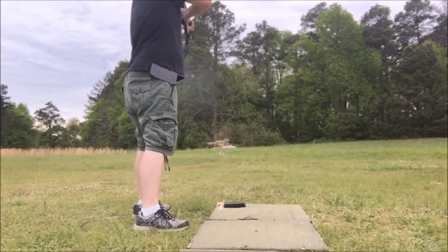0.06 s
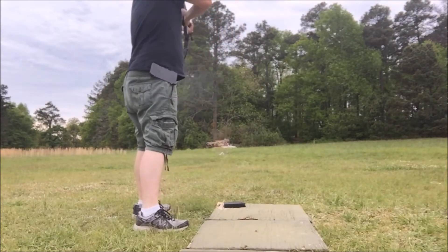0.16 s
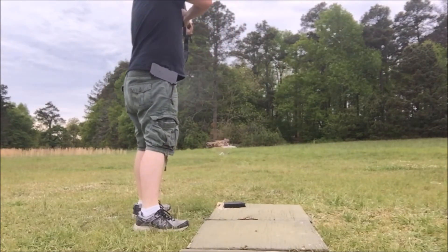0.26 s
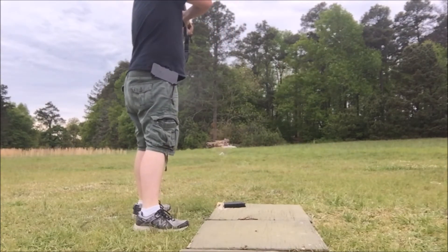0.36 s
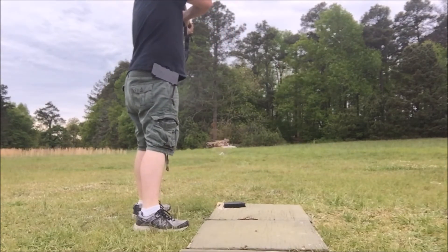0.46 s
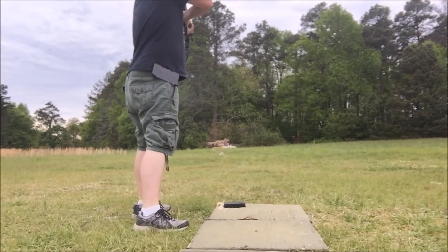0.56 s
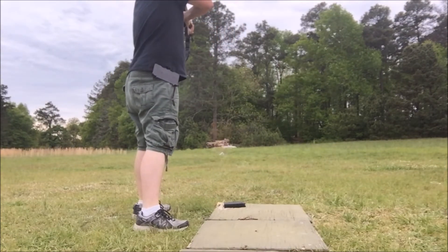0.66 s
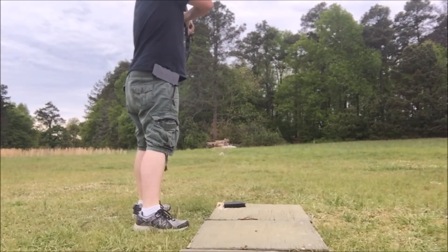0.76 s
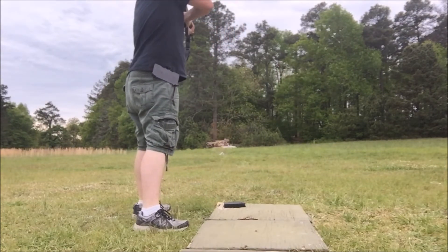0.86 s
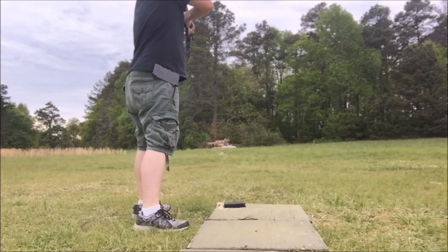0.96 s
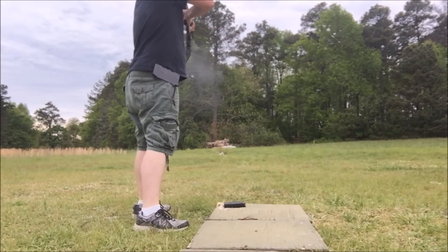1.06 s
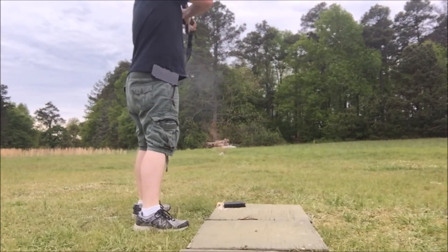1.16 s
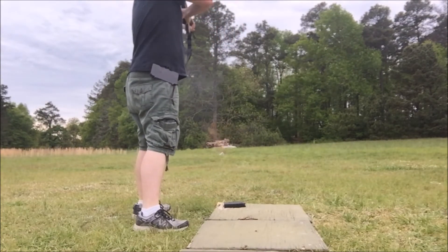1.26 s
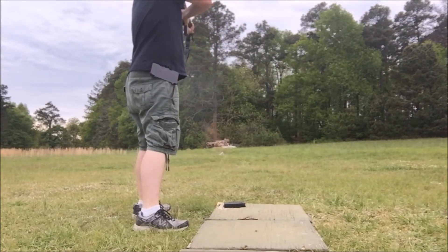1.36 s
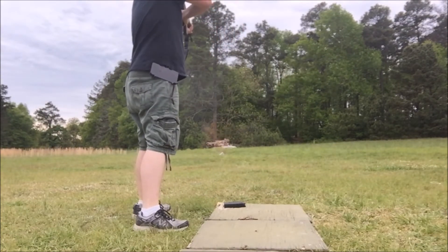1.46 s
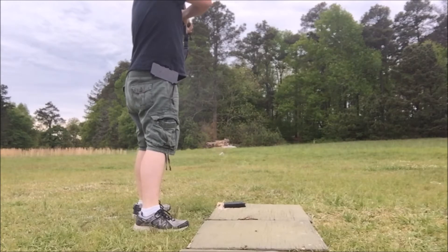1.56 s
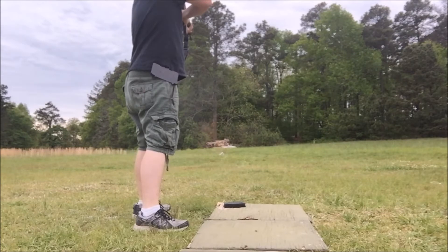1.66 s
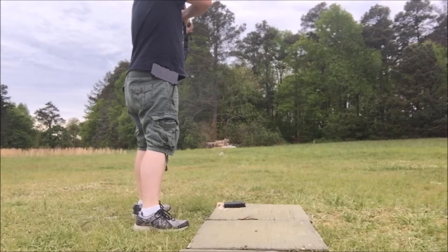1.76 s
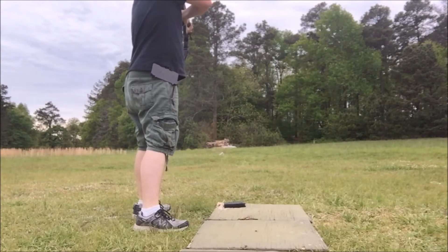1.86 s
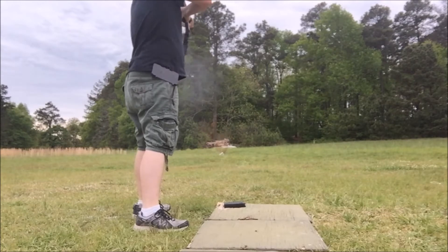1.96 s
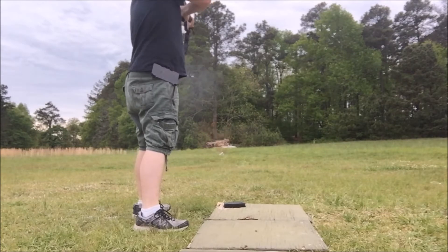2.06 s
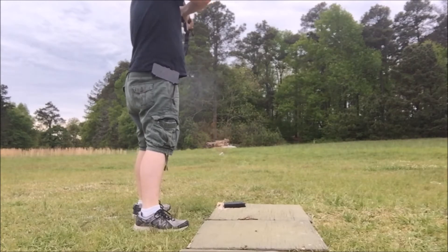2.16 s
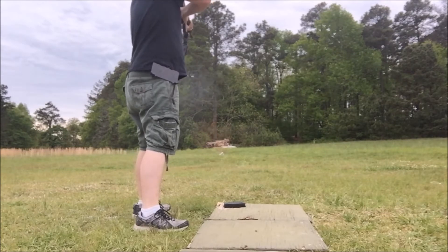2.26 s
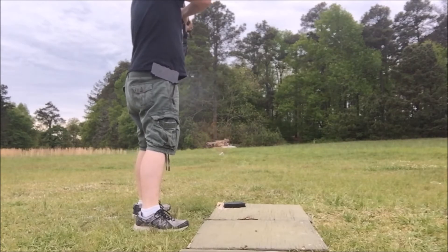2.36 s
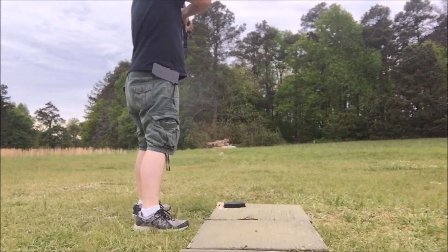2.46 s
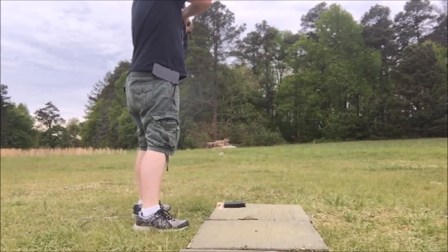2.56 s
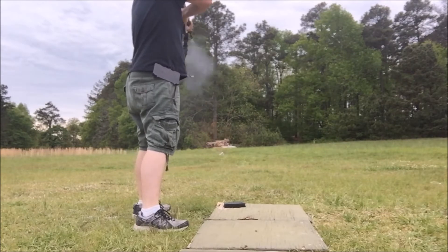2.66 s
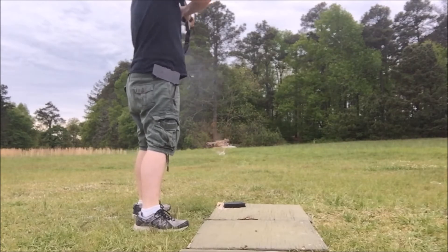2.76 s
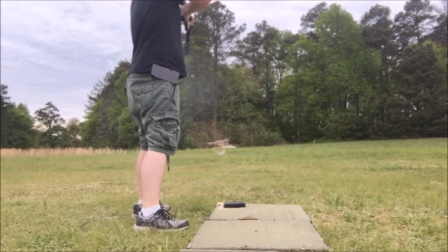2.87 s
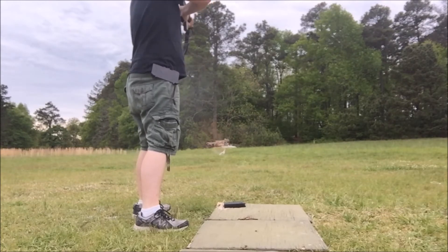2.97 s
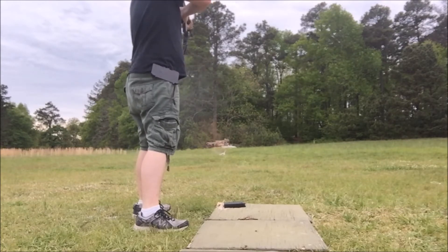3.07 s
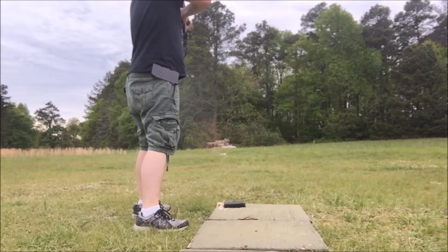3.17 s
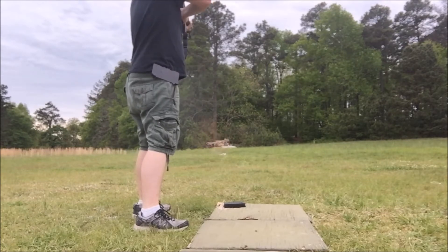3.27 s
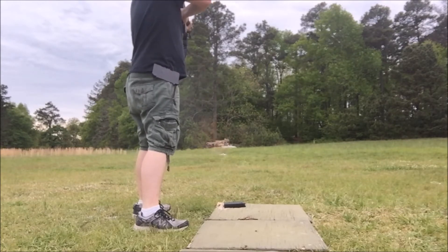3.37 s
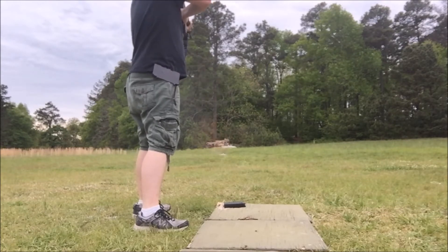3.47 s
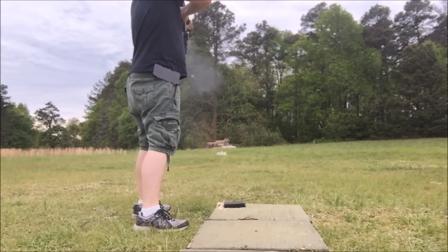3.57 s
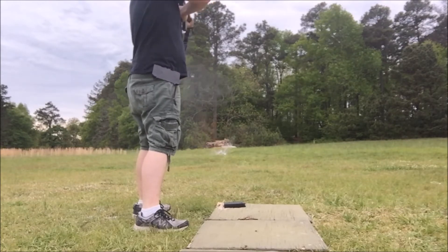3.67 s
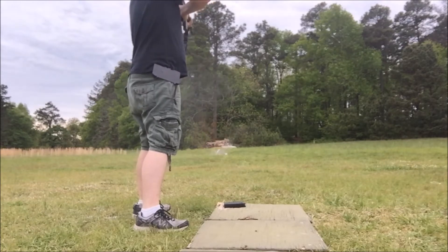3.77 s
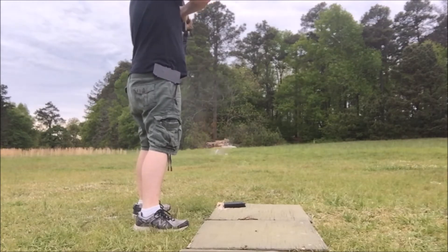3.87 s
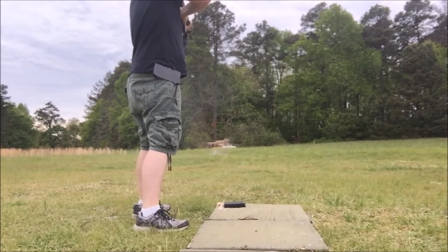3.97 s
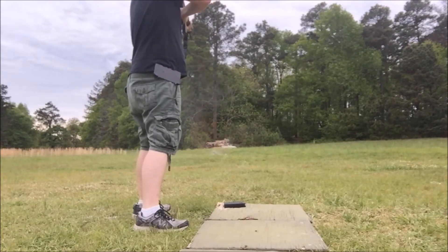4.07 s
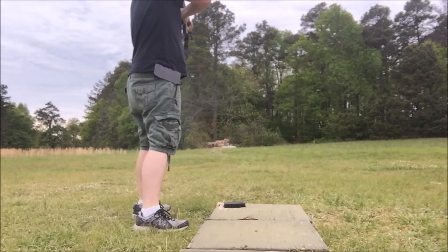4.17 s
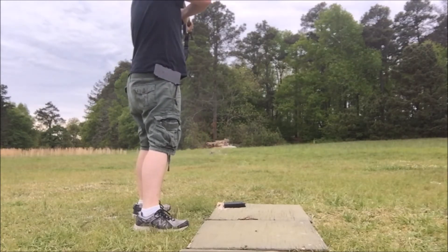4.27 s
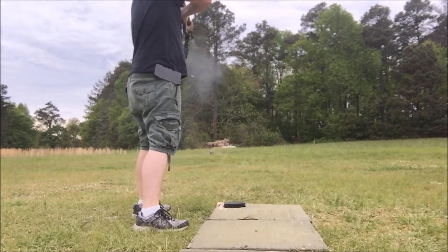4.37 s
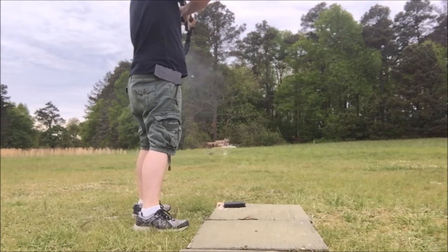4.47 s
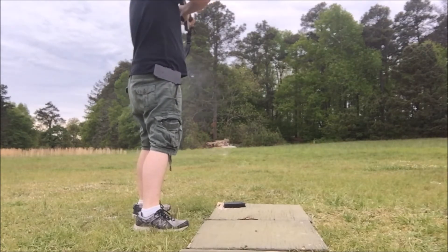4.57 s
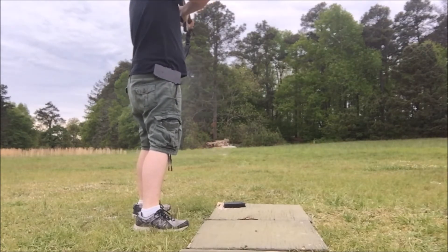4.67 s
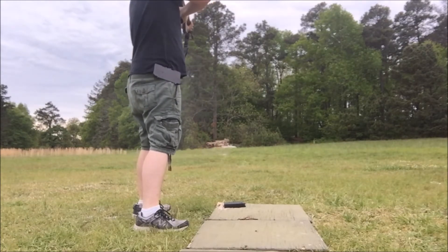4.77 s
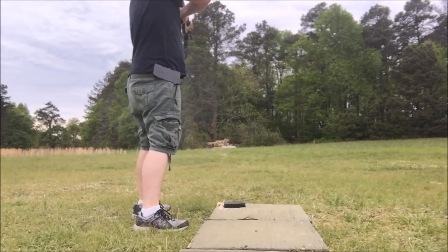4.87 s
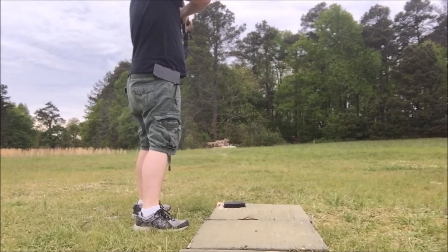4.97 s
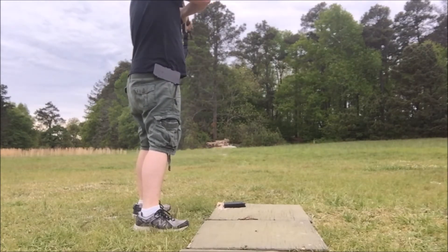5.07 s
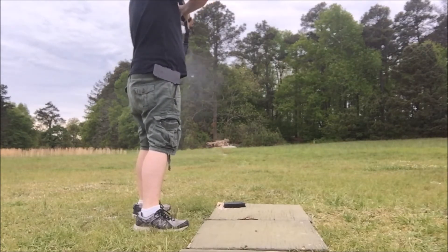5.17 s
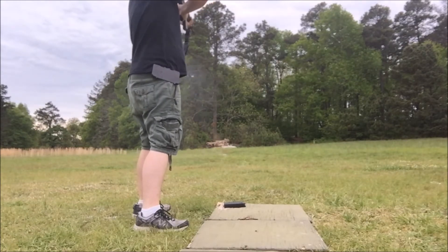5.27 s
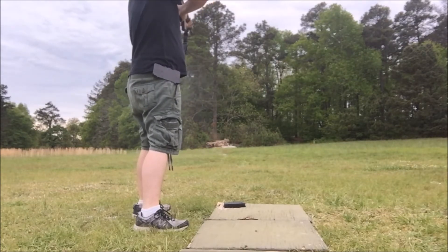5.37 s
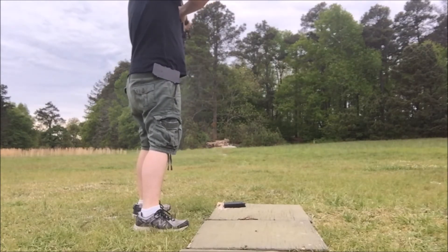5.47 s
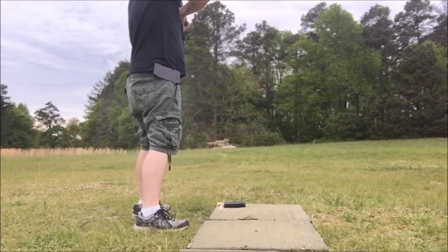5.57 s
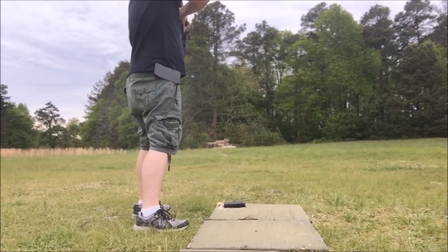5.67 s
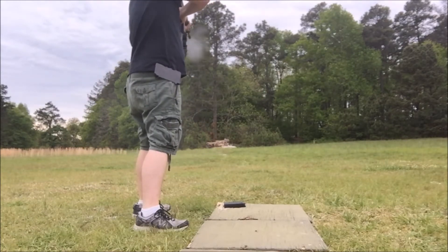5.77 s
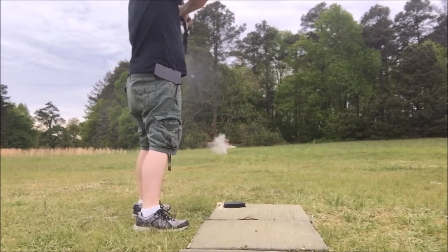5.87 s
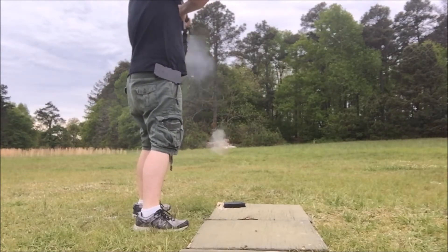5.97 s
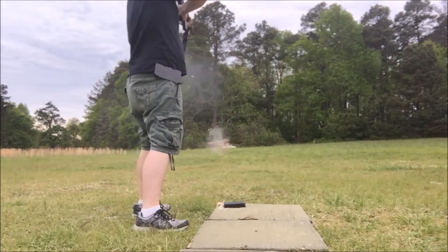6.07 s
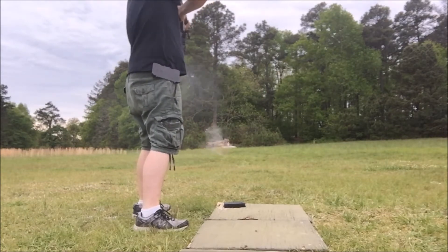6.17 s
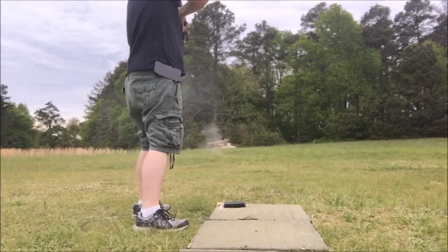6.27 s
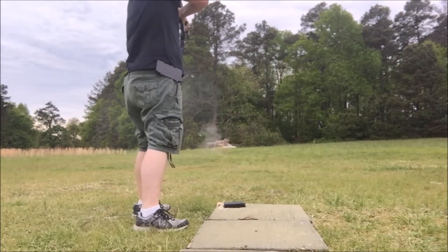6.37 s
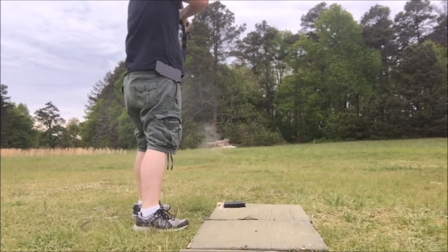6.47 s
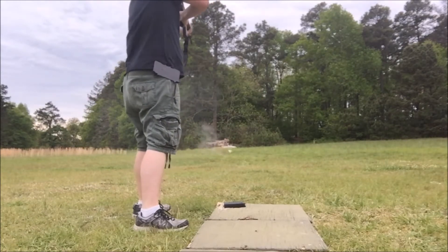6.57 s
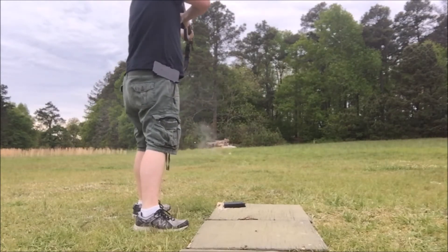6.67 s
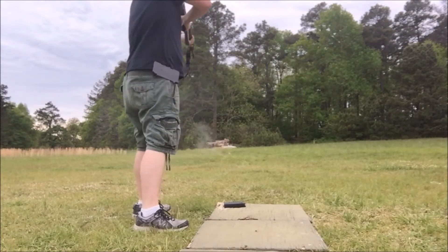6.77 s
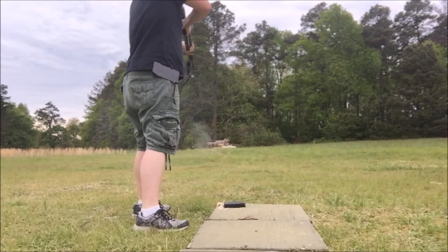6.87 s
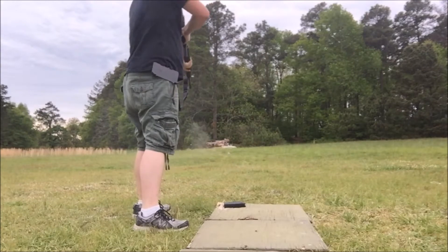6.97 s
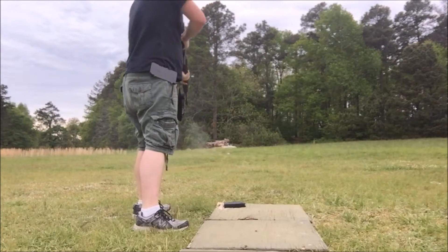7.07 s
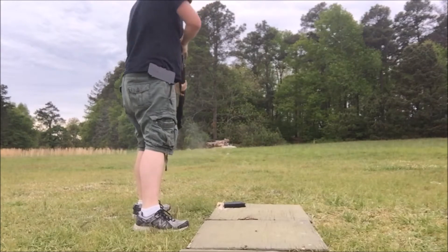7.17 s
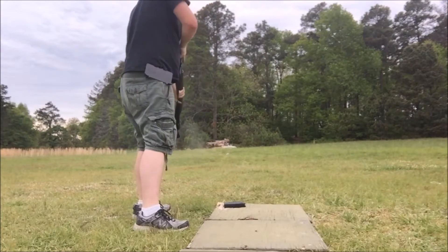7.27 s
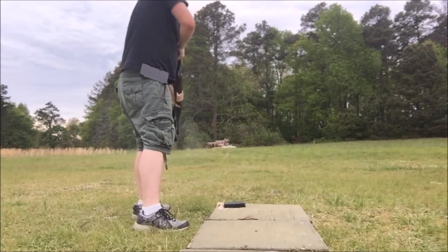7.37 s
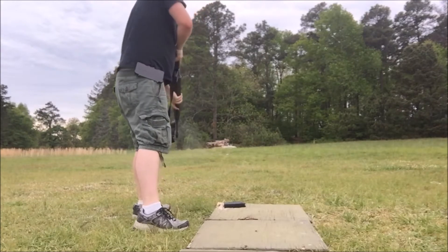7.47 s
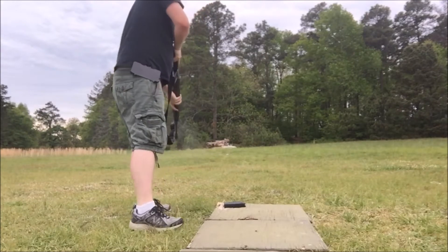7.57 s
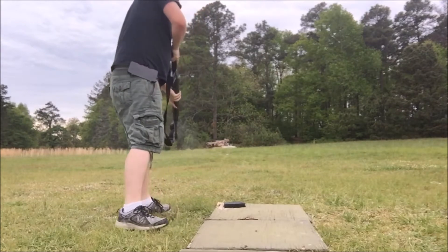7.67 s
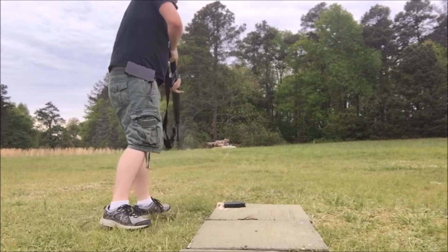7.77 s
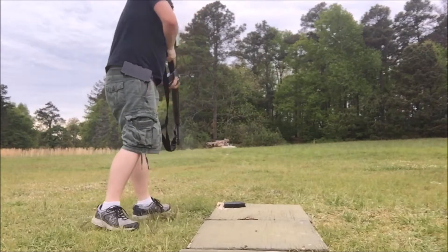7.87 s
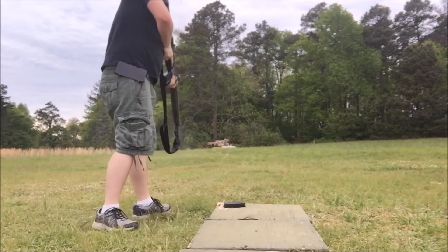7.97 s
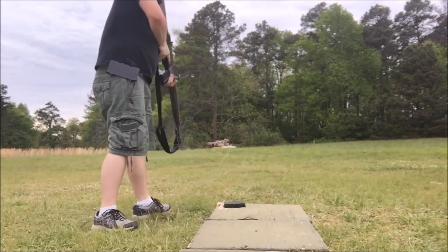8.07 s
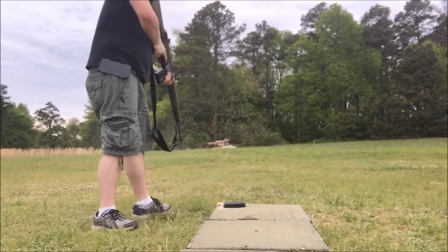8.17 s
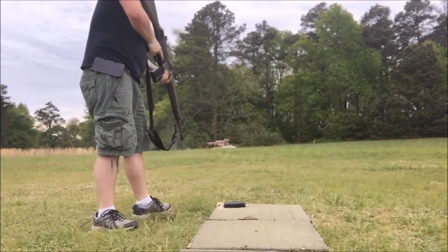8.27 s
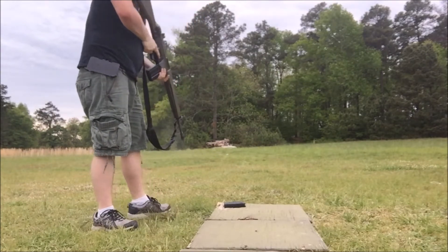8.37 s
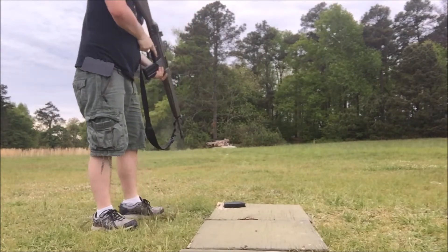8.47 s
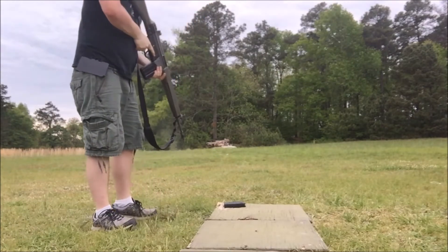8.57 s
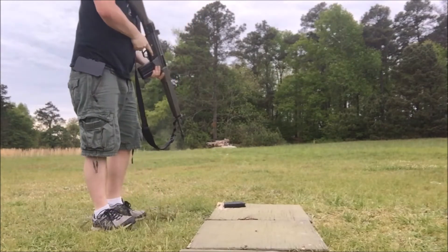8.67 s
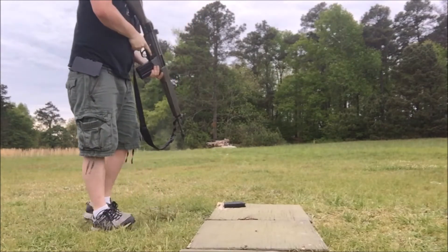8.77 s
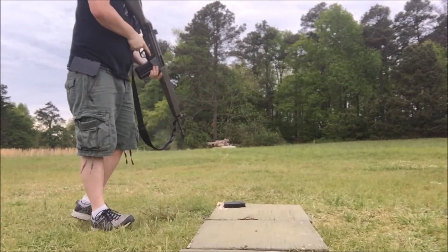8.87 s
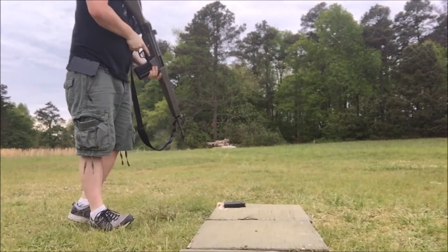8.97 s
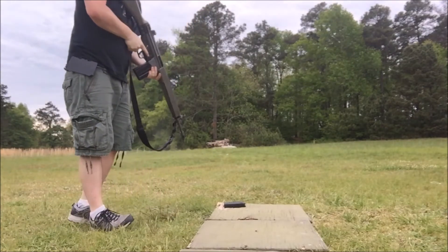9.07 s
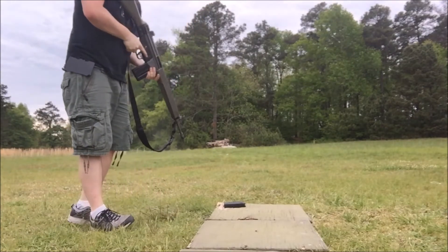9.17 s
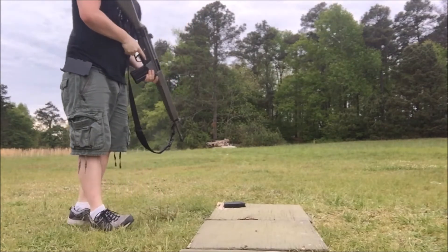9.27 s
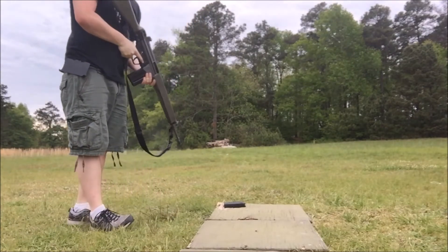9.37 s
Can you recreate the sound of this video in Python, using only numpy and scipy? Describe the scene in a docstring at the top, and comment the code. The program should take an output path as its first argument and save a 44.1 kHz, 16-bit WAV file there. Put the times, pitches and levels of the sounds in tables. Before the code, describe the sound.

Close to a rifle on an open grass field, earlier shots' echoes roll as spent cases clack on a board. Eight single clipped cracks follow, each with mechanical clicks, a low boom, a sharp slap and often a bullet thump. Woods return rolling echoes that swell as the microphone gain recovers. The last two shots come almost together, then brass ticks, rings and rattles, with faint grassy swishes in quiet air.

```python
"""Echoes of two rifle shots roll over a grass field in quiet air with a faint hum; spent cases land on a board.
Eight single shots follow: mechanical clicks, noise-burst crack, ground scatter, boom, slap and bullet thump.
Woods and far ground return shaped-noise echoes; two stray bullets crack among the trees.
Gain control ducks after each shot, then lets the echo swell; the blasts clip flat.
Last, cases tick, ring and rattle as decaying modes, and soft noise swishes as the shooter turns away."""
import sys
import numpy as np
from scipy import signal
from scipy.fft import rfft, irfft, next_fast_len
from scipy.io import wavfile
from scipy.ndimage import uniform_filter1d

SR = 44100
rng = np.random.default_rng(int(sys.argv[2]) if len(sys.argv) > 2 else 0)


def digitize_waveform(pressure):
    """Quantize a signal to 16-bit integers and store it at the path in sys.argv[1].

    Rows of a 2-D input are taken as channels; values are limited to [-1, 1].
    """
    field = np.atleast_2d(pressure).T
    bounded = np.clip(field, -1, 1)
    quanta = np.round(bounded * 32767).astype(np.int16)
    wavfile.write(sys.argv[1], SR, quanta)


N = 415863
LEAD = int(1.2 * SR)  # samples computed before the scene opens
TIME = np.arange(-LEAD, N) / SR  # s

# shots: t/s, blast/dB, tree echo/dB, hammer/dB, slap/dB, bullet thump/dB
SHOTS = [(-1.1, 0, -9, -20, 0, -10), (-.163, -2, 1.5, -20, 0, -10), (1.139, 2, 1.5, -13, 13, 17),
         (1.9985, 0, 0, -17, 9.5, 9), (2.781, 0, -1.5, -17, 9.5, 2), (3.648, 1.5, 0, -13, 12.5, 17),
         (4.4665, 0, 0, -18, 12.5, -4), (5.198, -2, 2.5, -19, 6, 6), (5.89, -1, 2, -15, 6, 20),
         (6.0815, -0.5, 1, -12, 12, -6)]
# spectrum of metallic clicks and the sharp reflection: f/Hz, density/dB
METAL_COLOUR = [(100, -10), (400, -2), (1100, 0), (2500, -4), (5000, -11), (9000, -16), (16000, -22)]


def from_db(db):
    """Amplitude ratio of a level in dB."""
    return 10 ** (np.asarray(db) / 20)


def rms_one(x):
    """Scale to rms 1."""
    return x / np.sqrt(np.mean(x ** 2) + 1e-20)


def span(seconds):
    """Time axis from 0, in s."""
    return np.arange(int(seconds * SR)) / SR


def add(track, start_s, sound):
    """Mix a sound into a track at start_s."""
    at = LEAD + round(start_s * SR)
    track[at:at + len(sound)] += sound[:len(track) - at]


def swell(t, peak_s, rise_db_per_s, fall_db_per_s, db=0, hold_s=0):
    """Gain that rises to db at peak_s, holds, and falls, both ramps linear in dB."""
    rise_db = rise_db_per_s * np.maximum(peak_s - t, 0)
    fall_db = fall_db_per_s * np.maximum(t - peak_s - hold_s, 0)
    return from_db(db - rise_db - fall_db)


def together(*gains):
    """Unrelated echoes add in power."""
    return np.sqrt(sum(gain ** 2 for gain in gains))


def noise(colour, size, count=1):
    """Steady noise of a given spectrum, rms 1 overall; one row per count."""
    hz, db = np.transpose(colour)
    n = next_fast_len(size, True)
    bins_hz = np.maximum(np.arange(n // 2 + 1) * SR / n, 1)
    gain = from_db(np.interp(np.log(bins_hz), np.log(hz), db))
    gain = gain * np.minimum(bins_hz / hz[0], 1)  # 6 dB per octave below the first point
    spectrum = rfft(rng.standard_normal((count, n))) * gain
    return rms_one(np.squeeze(irfft(spectrum, n)[:, :size]))


def burst(colour, t60_s):
    """A sudden noise that dies away exponentially."""
    t = span(.45)
    return noise(colour, len(t)) * from_db(-60 * t / t60_s)


def ring(modes):
    """A struck body: decaying sines whose strengths vary a little from blow to blow."""
    t = span(.45)
    out = 0
    for k, (hz, db, t60_s) in enumerate(modes):
        decay = from_db(db + rng.normal(0, 1) - 60 * t / t60_s)
        out = out + (-1) ** k * decay * np.sin(2 * np.pi * hz * t)
    return out


def through_air(x, travel_s, loss_db_per_s, power):
    """Air takes more treble the longer sound travels; loss is at 1 kHz, times 2**power per octave."""
    n = next_fast_len(len(travel_s), True)
    spectrum = rfft(x, n)
    octave = np.log2(np.maximum(np.arange(n // 2 + 1) * SR / n, 1) / 1000)  # re 1 kHz
    centres = np.array([-2, 0, 1, 1.5, 2, 2.5, 3, 4])
    out = 0
    for centre, pick in zip(centres, np.eye(len(centres))):
        weight = np.interp(octave, centres, pick)  # overlapping bands that sum to 1
        band = irfft(spectrum * weight, n)[..., :len(travel_s)]
        loss_db = loss_db_per_s * 2 ** (centre * power) * np.maximum(travel_s, 0)
        out = out + band * from_db(-loss_db)
    return out


def repeats(paths):
    """The landscape stays put: each shot gets the first echo pattern plus its own blend of the others."""
    blend = rng.standard_normal((len(SHOTS), len(paths) - 1))
    blend /= np.linalg.norm(blend, axis=1, keepdims=True)
    return [.8 * paths[0] + .6 * (weights[:, None] * paths[1:]).sum(axis=0) for weights in blend]


def rifle(hammer_hz, trigger_db, gas_db, crack_db, rebound_db, rebound_s):
    """Trigger and hammer click, gas escapes, the muzzle cracks, and the ground scatters the blast."""
    # blast scattered by the ground: f/Hz, density/dB
    scatter_colour = [(30, -10), (60, 1), (150, -.5), (210, -4), (340, 1), (680, -1), (900, -6), (1250, -4),
                      (1600, -10), (2100, -7), (3300, -11), (5000, -19), (8000, -25), (16000, -36)]
    # muzzle crack: f/Hz, density/dB
    crack_colour = [(60, -14), (300, -4), (900, 0), (3000, 0), (6000, -2), (9000, -7), (16000, -13)]
    out, t = np.zeros(len(TIME)), span(.45)
    peak_s, rise_db_per_s = .012, 750
    blast = swell(t, peak_s, rise_db_per_s, fall_db_per_s=900, db=21.5, hold_s=.031)
    near_grass = swell(t, peak_s, rise_db_per_s, fall_db_per_s=255, db=16)
    far_grass = swell(t, peak_s, rise_db_per_s, fall_db_per_s=20, db=-30.5)
    scatter = together(blast, near_grass, far_grass)
    grounds = repeats(noise(scatter_colour, len(t), count=6) * scatter)
    for (s, blast_db, _, hammer_db, _, _), ground in zip(SHOTS, grounds):
        add(out, s - .024, from_db(trigger_db) * burst(METAL_COLOUR, t60_s=.11))
        hammer = burst(METAL_COLOUR, t60_s=.06) + from_db(6) * ring([(hammer_hz, 0, .03)])
        add(out, s - .011, from_db(hammer_db) * hammer)
        # gas escaping ahead of the blast
        add(out, s - .0025, from_db(gas_db) * burst(METAL_COLOUR, t60_s=.05))
        crack = from_db(crack_db) * burst(crack_colour, t60_s=.065)
        add(out, s, crack + from_db(blast_db) * ground)
        # the crack rebounds from close by
        add(out, s + rebound_s, from_db(rebound_db) * burst(crack_colour, t60_s=.045))
    return out


def downrange(slap_s, slap_rise_db_per_s, slap_fall_db_per_s, thump_s, thump_hz, thump_width_s,
              reflection_s, reflection_db):
    """From the target: a slap of echo, the bullet's thump in the earth and one sharp reflection."""
    # slap echo: f/Hz, density/dB
    slap_colour = [(100, -6), (1200, 0), (3000, -4), (5000, -11), (8000, -7), (10000, -17), (16000, -23)]
    out, t = np.zeros(len(TIME)), span(.2)
    since_s = t - thump_s
    thump = np.cos(2 * np.pi * thump_hz * since_s) * np.exp(-(since_s / thump_width_s) ** 2)
    for s, _, _, _, slap_db, thump_db in SHOTS:
        level = swell(t, slap_s, slap_rise_db_per_s, slap_fall_db_per_s, slap_db)
        slap = noise(slap_colour, len(t)) * level
        add(out, s, slap + from_db(thump_db) * thump)
        add(out, s + reflection_s, from_db(reflection_db) * burst(METAL_COLOUR, t60_s=.016))
    return out


def rumble():
    """Each shot booms, rolls over the field and returns low from the wood's edge and far ground."""
    # boom: f/Hz, density/dB
    boom_colour = [(30, -30), (70, -8), (150, 0), (250, -1), (420, -10), (900, -30), (3000, -70)]
    out, t = np.zeros(len(TIME)), span(3.5)
    muzzle = swell(t, .043, rise_db_per_s=750, fall_db_per_s=305, db=9)
    roll = swell(t, .043, rise_db_per_s=750, fall_db_per_s=48, db=-15.5)
    edge = swell(t, .34, rise_db_per_s=170, fall_db_per_s=130, db=-19)
    far_ground = swell(t, 1.29, rise_db_per_s=34, fall_db_per_s=42, db=-31.5)
    horizon = swell(t, 1.29, rise_db_per_s=34, fall_db_per_s=6.5, db=-42)  # lingers after far ground
    level = together(muzzle, roll, edge, far_ground, horizon)
    for (s, *_), boom in zip(SHOTS, repeats(noise(boom_colour, len(t), count=3) * level)):
        add(out, s, boom)
    return out


def wood(clump_db, grain_db):
    """Trunks and crowns return small echoes in clumps: stands at the edge, then the longer-lived depths."""
    # echo off the wood: f/Hz, density/dB
    wood_colour = [(18, -55), (30, -25), (124, -1), (199, -1), (266, -15), (303, -2), (486, -9), (526, -6),
                   (760, -8), (1010, -3), (1810, -11), (2010, -10), (3770, -15), (6380, -30), (16000, -63)]
    # stands at the edge, one echo each: t after shot/s, level/dB
    stands = [(.378, -9), (.455, -14), (.74, -20.5)]
    out, t = np.zeros(len(TIME)), span(3.5)
    clumps = rms_one(uniform_filter1d(rng.standard_normal(len(t)), size=700))
    grains = rms_one(uniform_filter1d(rng.standard_normal(len(t)), size=60))
    edge = [swell(t, s, rise_db_per_s=265, fall_db_per_s=52, db=db) for s, db in stands]
    depths = swell(t, .37, rise_db_per_s=120, fall_db_per_s=10.4, db=-24.5)
    roll = together(depths, *edge) * from_db(clump_db * clumps + grain_db * grains)
    crowns = noise(wood_colour, len(t), count=3) * roll
    crowns = through_air(crowns, t - .39, loss_db_per_s=1.9, power=1.68)
    for (s, _, echo_db, _, _, _), echo in zip(SHOTS, repeats(crowns)):
        add(out, s, from_db(echo_db) * echo)
    return out


def far_trees():
    """A second tree line sends back a late, soft wash that has lost its top on the way."""
    # wash: f/Hz, density/dB
    wash_colour = [(500, -28), (1300, -5), (2000, 0), (3000, -3), (6000, -18)]
    out, t = np.zeros(len(TIME)), span(3)
    level = swell(t, 1.2, rise_db_per_s=17, fall_db_per_s=26, db=-35.5)
    wash = noise(wash_colour, len(t), count=3) * level
    wash = through_air(wash, t - .39, loss_db_per_s=1.0, power=2.35)
    for (s, _, echo_db, _, _, _), echo in zip(SHOTS, repeats(wash)):
        add(out, s, from_db(echo_db) * echo)
    return out


def stray_bullet():
    """The crack comes back from ever deeper among the trees, duller as it goes."""
    # bullets that clear the bank and fly on into the wood: t of arrival/s, level/dB
    strays = [(4.726, 0), (6.362, -4.5)]
    # scattered crack: f/Hz, density/dB
    stray_colour = [(300, -25), (700, -10), (1100, 0), (2000, -3), (3500, -5), (5000, -12), (8000, -25),
                    (15000, -38)]
    out, t = np.zeros(len(TIME)), span(.8)
    for s, db in strays:
        level = swell(t, .012, rise_db_per_s=2900, fall_db_per_s=80, db=db, hold_s=.04)
        crack = noise(stray_colour, len(t)) * level
        add(out, s, through_air(crack, t - .03, loss_db_per_s=2.0, power=1.6))
    return out


def cases():
    """Spent cases tick, ring and clatter as noise and brass modes, and rattle the modes of a board."""
    # landings: t/s, tick/dB, ring/dB, clack/dB, board thud/dB
    landings = [(.689, -40, -41, -17, -33), (.782, -41, -54, -20, -15.5), (.938, -60, -60, -27, -50),
                (6.3037, -12, -44, -28, -50), (6.6739, -17, -21, -45, -50), (6.7971, -20, -39, -9, -40),
                (7.013, -26, -48, -14, -40), (7.101, -42, -49, -37, -50)]
    # modes of a brass case: f/Hz, level/dB, t60/s
    brass = [(9157, -11, .17), (12260, -12, .25), (12450, -5, .2), (14280, -5, .16), (14350, 0, .2),
             (14420, -8, .17)]
    # modes of the board: f/Hz, level/dB, t60/s
    board = [(172, -1, .28), (231, -3, .3), (300, -3, .25), (385, -4, .2), (470, -5, .12), (560, -8, .1),
             (651, -8, .13), (894, -12, .1)]
    # contact tick: f/Hz, density/dB
    tick_colour = [(2000, -20), (6000, -6), (8000, 0), (15000, -2)]
    # clatter: f/Hz, density/dB
    clack_colour = [(150, -10), (1100, 0), (2500, -3), (4500, -12), (8000, -26), (16000, -38)]
    rattle_s, rattle_loss_db = .014, 4.5  # nominal time between knocks, loss at each
    out = np.zeros(len(TIME))
    for s, tick_db, ring_db, clack_db, thud_db in landings:
        add(out, s, from_db(tick_db) * burst(tick_colour, t60_s=.03))
        add(out, s, from_db(clack_db) * burst(clack_colour, t60_s=.17))
        add(out, s, from_db(ring_db) * ring(brass))
        for k in range(4):
            knock_s = s + k * rattle_s * rng.uniform(.8, 1.2)
            add(out, knock_s, from_db(thud_db - k * rattle_loss_db) * ring(board))
    return out


def rustles():
    """Shoes in grass and the sling rubbing: soft band-noise swishes as the shooter turns away."""
    # swishes: t/s, level/dB, half length/s, centre f/Hz, fall per octave/dB
    swishes = [(7.82, -60, .06, 7000, 5), (8.05, -45, .018, 2700, 50), (8.05, -64, .04, 7000, 8),
               (8.42, -68, .05, 4000, 12), (8.52, -66, .07, 11000, 8)]
    out, t = np.zeros(len(TIME)), span(.5) - .25
    for s, db, half_s, hz, fall_db in swishes:
        colour = [(hz / 2, -fall_db), (hz, 0), (hz * 2, -fall_db), (hz * 10, -2 * fall_db)]
        swish = noise(colour, len(t)) * np.exp(-(t / half_s) ** 2)
        add(out, s + t[0], from_db(db) * swish)
    return out


def field(air_db, hum_hz, hum_db):
    """Quiet open air as coloured noise, with a faint far hum as narrow-band noise."""
    # open air: f/Hz, density/dB
    air_colour = [(20, -8), (60, 0), (150, -3), (400, -14), (1000, -23), (2000, -32), (4500, -37),
                  (7000, -36), (10000, -42), (16000, -44)]
    hum = noise([(hum_hz * .9, -70), (hum_hz, 0), (hum_hz * 1.1, -70)], len(TIME))
    return from_db(air_db) * noise(air_colour, len(TIME)) + from_db(hum_db) * hum


def gain_control(x, threshold_db, depth_db, attack_s, release_db_per_s):
    """Loud sound pulls the gain down, too late for the crack; it creeps back linearly in dB."""
    power = uniform_filter1d(x ** 2, size=88, origin=43)  # mean over the last 2 ms
    level_db = 10 * np.log10(np.maximum(power, 1e-12))
    excess_db = np.clip(level_db - threshold_db, 0, depth_db)
    release_db = release_db_per_s * TIME
    held_db = np.maximum.accumulate(excess_db + release_db) - release_db
    r = np.exp(-1 / (attack_s * SR))
    return x * from_db(-signal.lfilter([1 - r], [1, -r], held_db))


def scene():
    """Everything reaches one microphone, whose gain is already working when the scene opens."""
    shots = rifle(hammer_hz=950, trigger_db=-22, gas_db=-2.5, crack_db=23, rebound_db=15, rebound_s=.027)
    target = downrange(slap_s=.083, slap_rise_db_per_s=2600, slap_fall_db_per_s=800,
                       thump_s=.1105, thump_hz=300, thump_width_s=.0023,
                       reflection_s=.1165, reflection_db=4)
    echoes = rumble() + wood(clump_db=1.3, grain_db=1.6) + far_trees() + stray_bullet()
    background = field(air_db=-54, hum_hz=156, hum_db=-49)
    air = shots + target + echoes + cases() + rustles() + background
    # the small capsule misses deep bass
    heard = signal.sosfilt(signal.butter(2, 40, "high", fs=SR, output="sos"), air)
    levelled = gain_control(heard, threshold_db=-16, depth_db=30, attack_s=.0145, release_db_per_s=29)
    return levelled[None, LEAD:]


def record(dry):
    """The blasts clip flat; the top is cut above 16 kHz."""
    clipped = np.clip(dry, -.95, .95)
    lowpass = signal.ellip(10, .1, 70, 16000, fs=SR, output="sos")
    return np.clip(signal.sosfilt(lowpass, clipped), -1.2, 1.2)


dry = scene()
out = record(dry)
digitize_waveform(out)
```